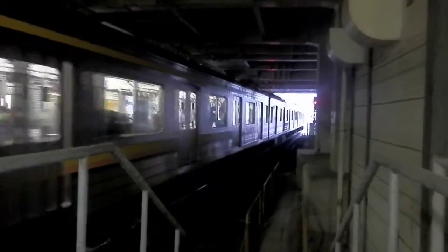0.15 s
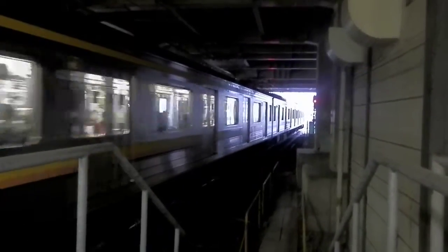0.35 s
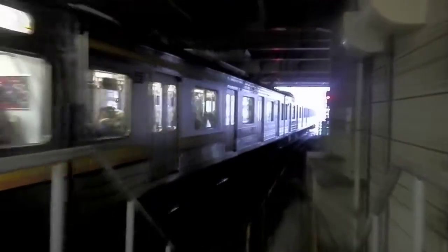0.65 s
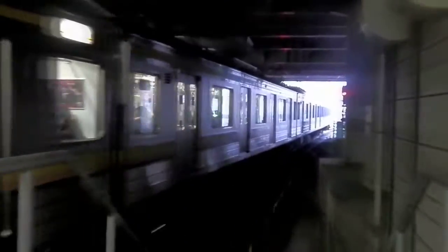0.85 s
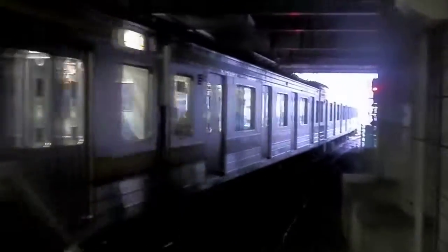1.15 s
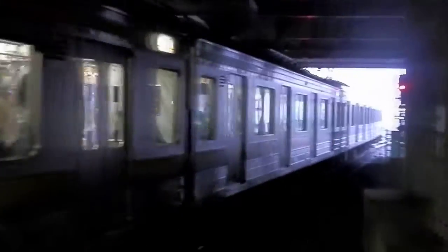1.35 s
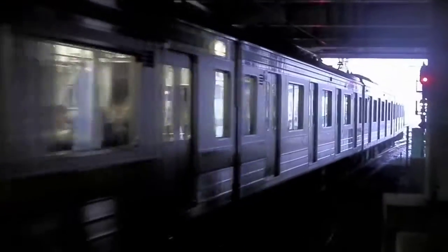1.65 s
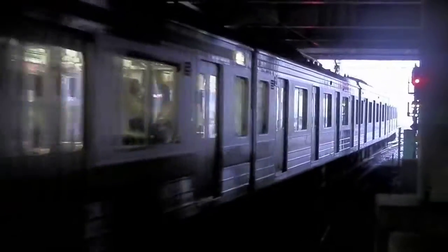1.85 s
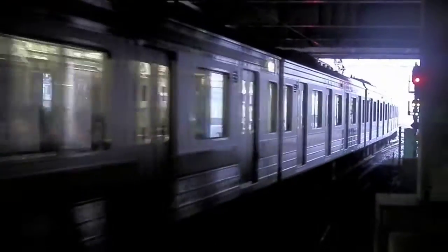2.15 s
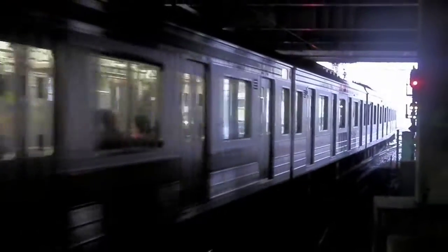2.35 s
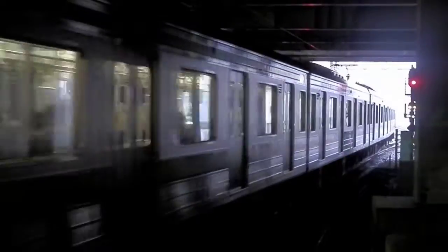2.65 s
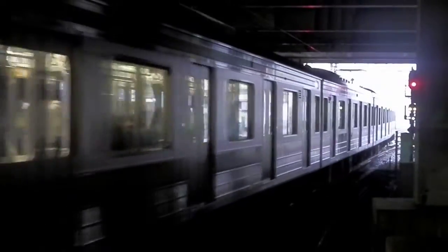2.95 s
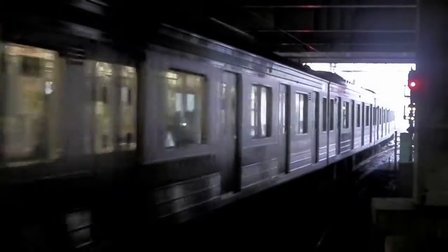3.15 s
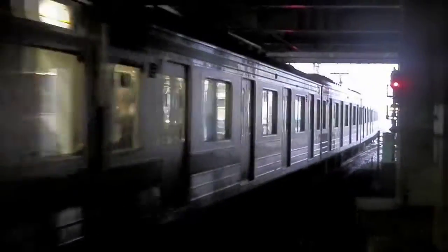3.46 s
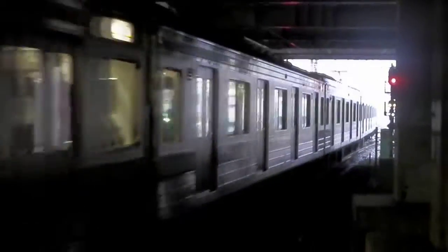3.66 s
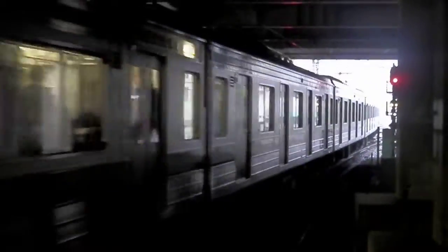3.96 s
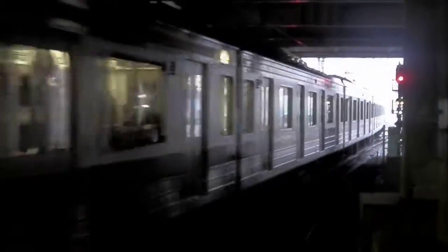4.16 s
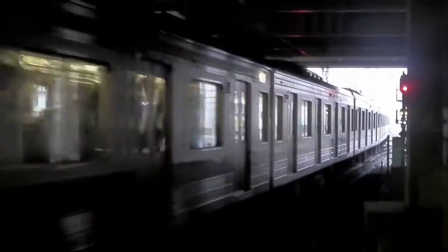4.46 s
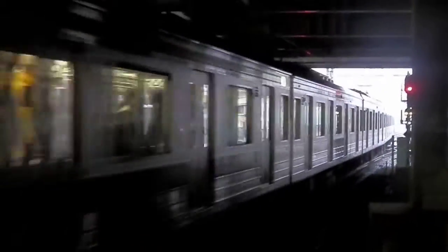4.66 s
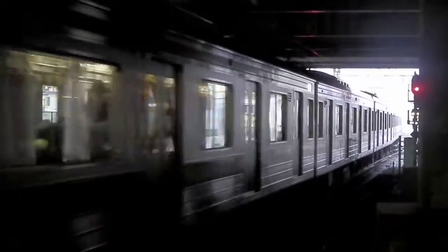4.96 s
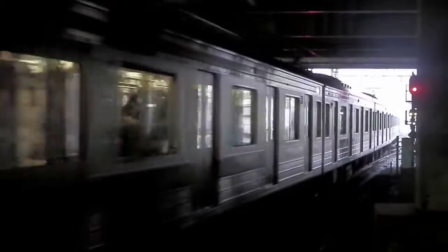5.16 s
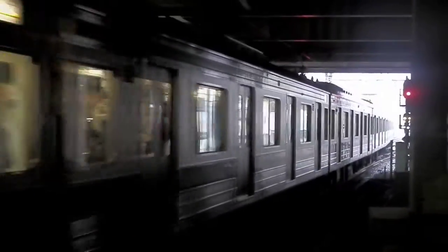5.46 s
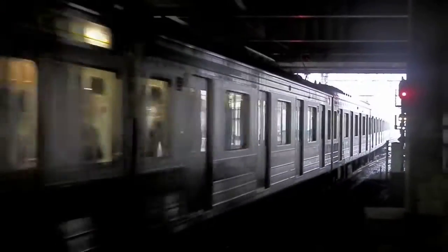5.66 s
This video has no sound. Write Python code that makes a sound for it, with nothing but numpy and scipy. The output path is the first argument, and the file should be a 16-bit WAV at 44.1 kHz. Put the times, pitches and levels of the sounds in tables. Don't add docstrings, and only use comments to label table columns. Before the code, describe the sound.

A departing train passes a small mono recorder in a dark covered station. Its gear whine wobbles, cuts out and swells as motors beat against one another, climbing gradually in pitch. Wheels rumble and roll steadily, with faint metallic ringing and hiss. The broad hiss dulls briefly, then a tiny case knock makes the sound drop and recover. Later swells also pump the level; friction hiss strengthens near the end.

```python
import sys
import numpy as np
from scipy import signal
from scipy.fft import rfft, irfft, next_fast_len
from scipy.io import wavfile
from scipy.ndimage import uniform_filter1d

SR = 44100
rng = np.random.default_rng(int(sys.argv[2]) if len(sys.argv) > 2 else 0)


def gain_from_decibels(decibels):
    exponent = np.asarray(decibels, float) / 20
    return 10 ** exponent


def master(y):
    cut = np.clip(np.atleast_2d(y).T, -1, 1)
    pcm = np.round(cut * 32767)
    wavfile.write(sys.argv[1], SR, pcm.astype(np.int16))


N = 255780

# [t/s, gear tooth rate f/Hz, level/dB]
MOTOR_WHINE = [(0, 264.7, -11), (.15, 261.4, -8), (.45, 262.9, -6.5), (.7, 269.1, -13.5),
               (1.18, 273.6, -11.5), (1.28, 276, -8.5), (1.42, 273, -22), (1.601, 281, -7.5),
               (1.95, 280.6, -10), (2.161, 282.3, -3), (2.26, 282, -11), (2.621, 286.5, -11),
               (2.88, 287.3, -2.5), (3.379, 292.8, -4), (3.7, 297.4, -9.5), (4.35, 307.9, -10),
               (4.74, 315.9, -8.5), (5.8, 332.9, -18.5)]
# [t/s, depth/dB, sinking/s, returning/s]
MOTOR_SLIPS = [(0, 6, .05, 0.092), (.12, 12, .04, 0.024), (.2, 25, 0.041, 0.16), (.39, 14, .06, 0.048),
               (.5, 16, 0.046, 0.23), (0.741, 30, 0.14, 0.084), (.88, 28, 0.14, 0.026),
               (1.12, 24, .11, 0.057), (1.231, 42, 0.063, .05), (1.319, 12.5, .04, .06),
               (1.41, 18, .03, 0.029), (1.54, 15, 0.13, .04), (1.61, 18, 0.023, 0.051),
               (1.679, 27, 0.038, 0.066), (1.79, 26, 0.031, .18), (2.061, 27, 0.091, 0.093),
               (2.51, 19, .03, 0.016), (2.559, 28, .03, .06), (2.651, 14, .03, 0.034),
               (2.832, 34.5, 0.055, 0.033), (3.29, 36, 0.076, 0.098), (3.51, 12, .13, 0.14),
               (3.7, 8, 0.12, 0.026), (3.87, 5.5, .04, .06), (4.01, 22, .03, 0.058),
               (4.33, 12, 0.019, 0.19), (4.81, 21, .07, 0.098), (4.96, 11, 0.068, .13),
               (5.14, 24, 0.038, .25), (5.43, 11, .07, .36)]
# [t/s, share added or cancelled, length/s]
QUICK_BEATS = [(0.037, -0.6, 0.011), (0.724, 11.5, .008), (0.855, 3, 0.006), (.948, -0.24, 0.017),
               (1.807, 1, 0.015), (2.056, 2.5, 0.0083), (2.274, 0, .02), (2.375, -0.04, 0.016),
               (2.751, -1, 0.01), (3.108, -0.1, 0.028), (3.188, -0.5, .012), (3.805, -.35, 0.016),
               (4.129, 0.15, 0.024), (4.24, 0.6, 0.007), (4.383, -2.1, 0.0068), (4.708, -0.5, 0.0068),
               (4.829, 4, 0.0077), (4.852, -1, 0.0083), (5.02, 0.2, 0.02), (5.051, -0.5, 0.0087),
               (5.251, 0.5, 0.0073), (5.569, -0.5, .012), (5.724, 0.6, 0.017), (5.757, -1, 0.006),
               (0.616, 1.7, 0.0091), (0.792, 3.2, 0.012), (2.624, 1.5, 0.017), (2.963, -.4, 0.011),
               (4.564, -.7, .018), (5.334, 0.45, 0.019)]
# [f/Hz, level/dB]
GEAR_HOUSING = [(525, -24), (555, -32), (600, -26.5), (665, -26), (800, -33), (835, -40), (935, -35.5),
                (1000, -35)]
# [t/s, nearness level/dB, friction level/dB]
PASSING_WHEELS = [(0, 0, 5.5), (.2, 0.5, 8), (.32, 4, 4.5), (.46, 1.5, -2.5), (.7, 0, -3.5), (1.2, -2, -6),
                  (1.5, -2, -9), (1.75, -2.5, -4), (2.1, -0.5, 2), (2.45, 2.5, -2), (2.88, 4.5, -.5),
                  (3.1, -0.5, -1), (3.55, 0, 1), (4.1, 1, 1), (4.3, 3, -1.5), (4.7, 3.5, 8.5), (5.15, 4, 4),
                  (5.8, 1.5, -4)]
# (level/dB, share of nearness, share of friction, gain/dB per 100 Hz of tooth rate,
# loss under the hand/dB)
LAYER_LEVELS = dict(rumble=(-27, 1.16, 0.01, -1.5, -0.5), roll=(-18, 1.04, 0.12, -0.5, 1.4),
                bogie=(-26.5, 1.04, 0.22, 5.5, 1), ring=(-33, 1.08, 0.36, 7.5, 3),
                broad=(-37, 0.8, 0.57, 4, 21.5), high=(-46, 0.17, 1.12, -0.5, -1.3),
                top=(-70, 0.6, 1.2, 2.5, -1), disc=(-48.5, 1.1, 0.1, 22.5, -2))

RUMBLE_COLOUR = [(18, -33), (35, -11), (60, -4.5), (85, 0.5), (110, -3), (150, -1.5), (210, 3), (280, -33)]
# [f/Hz, level/dB per Hz]
ROLL_COLOUR = [(130, -21.5), (200, -4.5), (240, -0.5), (290, 3.5), (350, 1.5), (440, -2), (520, -3),
               (600, -7), (700, -18.5), (900, -39.5)]
# [f/Hz, level/dB per Hz]
BOGIE_COLOUR = [(450, -28), (620, -1), (750, 2), (900, -4.5), (1000, -7.5), (1150, -8), (1300, -10),
                (1800, -32.5)]
# [f/Hz, level/dB per Hz]
RING_COLOUR = [(1000, -21), (1400, 1), (1700, -2.5), (1950, -1.5), (2300, -1.5), (2800, -7), (3100, -10),
               (3600, -15), (4500, -25), (6000, -47.5)]
# [f/Hz, level/dB per Hz]
DISC_COLOUR = [(1750, -30), (1880, -2.5), (1960, 0.5), (2080, -4), (2250, -29.5)]
# [f/Hz, level/dB per Hz]
BROAD_COLOUR = [(1800, -19.5), (2800, -1.5), (3600, -3.5), (4600, -2.5), (5500, -6.5), (7000, -8.5),
                (8300, -15.5), (10000, -34), (12000, -41)]
# [f/Hz, level/dB per Hz]
HIGH_COLOUR = [(4000, -25), (5500, -9), (7000, -3.5), (7900, 0), (8800, -6.5), (10000, -13.5), (11300, -28),
               (13000, -40.5)]
# [f/Hz, level/dB per Hz]
TOP_COLOUR = [(9500, -22), (11000, 0.5), (14500, -1.5), (15700, -1), (16200, -39)]

# [f/Hz, width/Hz, level/dB]
RAIL_RESONANCES = [(537, 17, 3.5), (83, 36, 1.5)]
# [f/Hz, width/Hz, level/dB]
WHEEL_RESONANCES = [(1110, 50, 3.5), (1410, 110, 0.5), (1920, 140, 3), (2270, 44, 3), (2900, 72, 1.5),
                    (3700, 80, 3.5)]
# [t/s, length/s, gain/dB]
TOP_LIFTS = [
    (.44, .885, 7),
    (1.95, .5, 3.5),
    (3.33, .64, 7),
    (4.22, 1.5, 7),
]
# [t/s, level/dB, brightness 0-1]
TICK_CONTACTS = [
    (1.3227, -38, 0.9),
    (1.3234, -40.5, 0.7),
    (1.3237, -33.5, .95),
    (1.3242, -23, 0.1),
    (1.3246, -27.5, .35),
    (1.3269, -30, 0.25),
]
# [f/Hz, level/dB, time to fall 60 dB/s]
CASE_MODES = [(1790, 1, 0.016), (2293, -4, 0.0064), (2860, -3, 0.011), (3400, -1.5, 0.0057),
              (3970, -10, .006), (5530, -7.5, .005), (6550, -7, 0.0055), (7300, -5, 0.0079),
              (8500, -4, 0.0031), (10200, -9, 0.0017), (12200, -13, .002), (14000, -8, 0.0016),
              (15700, -11.5, .002)]
# [t/s, depth/dB, attack/s]
GAIN_DUCKS = [(0.089, 5, 0.0051), (.34, 1.5, .005), (0.436, 4, 0.005), (1.3228, 14.5, 0.0048),
              (2.115, 3.5, 0.0085), (2.525, 5.5, 0.0079), (2.866, 7.5, .008), (3.21, 3, 0.0079),
              (3.885, 2.5, 0.0083), (3.97, 2.5, .008), (4.225, 3.5, .008), (4.55, 4, 0.0077),
              (4.68, 3, 0.0081), (4.91, 2.5, .008), (5.326, 2.5, .008)]

DUCK_HOLD_S, DUCK_RELEASE_S = 0.078, 0.32
MEAN_TOOTH_HZ = 290
HAND_ON_S, HAND_OFF_S, HAND_MOVE_S = 0.45, 1.43, 0.049
TIME = np.arange(N) / SR


def motors(roll_db):
    s, hz, db = np.transpose(MOTOR_WHINE)
    pitch = np.interp(TIME, s, hz)
    turn = 2 * np.pi * np.cumsum(pitch) / SR

    in_step = np.ones(N)
    for at, depth_db, sink, back in MOTOR_SLIPS:
        slip = np.interp(TIME, [at - sink, at, at + back], [0, 1, 0])
        in_step *= 1 - (1 - gain_from_decibels(-depth_db)) * slip
    swell = uniform_filter1d(np.interp(TIME, s, gain_from_decibels(db)) * in_step, size=500)
    beats = np.zeros(N)
    for at, share, length in QUICK_BEATS:
        beats += share * np.exp(-0.5 * ((TIME - at) / length) ** 2)
    swell *= 1 + beats
    flicker = gain_from_decibels(1.2 * drift(16.0))
    near = np.sqrt(2) * swell * flicker * np.sin(turn + 0.2 * drift(9.0))

    glide = 2 * np.pi * np.cumsum(uniform_filter1d(pitch, size=20000)) / SR
    far = gain_from_decibels(roll_db - 16.0) * beating(glide, 16.0)
    housing_hz, housing_db = np.transpose(GEAR_HOUSING)
    second_db = np.interp(2 * pitch, housing_hz, housing_db)
    third_db = np.interp(3 * pitch, housing_hz, housing_db)
    second = gain_from_decibels(second_db) * beating(2 * glide, 15.0)
    third = gain_from_decibels(third_db) * beating(3 * glide, 18.0)
    return near + far + second + third


def wheels(roll_db):
    rumble = gain_from_decibels(layer_db("rumble")) * coloured(RUMBLE_COLOUR, patchy_db=0.5, modes=RAIL_RESONANCES)
    roll = gain_from_decibels(roll_db) * coloured(ROLL_COLOUR, patchy_db=1.5, modes=RAIL_RESONANCES)
    bogie = gain_from_decibels(layer_db("bogie")) * coloured(BOGIE_COLOUR, patchy_db=1.52, modes=WHEEL_RESONANCES)
    ring = gain_from_decibels(layer_db("ring") + 0.64) * coloured(RING_COLOUR, patchy_db=0.24, modes=WHEEL_RESONANCES)
    disc = gain_from_decibels(layer_db("disc")) * coloured(DISC_COLOUR, patchy_db=3.0)
    return rumble + roll + bogie + ring + disc


def tick():
    out = np.zeros(N)
    s, db, bright = np.transpose(TICK_CONTACTS)
    for k, (hz, mode_db, t60) in enumerate(CASE_MODES):
        clicks = np.full(N, 1e-18)
        tilt_db = -12.0 * (0.5 - bright) * np.log2(hz / 1760)
        clicks[np.round(s * SR).astype(int)] = gain_from_decibels(db + mode_db + tilt_db)
        r = gain_from_decibels(-60 / (t60 * SR))
        w = 2 * np.pi * hz / SR
        ringing = signal.lfilter([0, np.sin(w)], [1, -2 * r * np.cos(w), r * r], clicks)
        out += (-1) ** k * ringing
    return out


def hiss():
    lift_db = np.zeros(N)
    for s, length, gain_db in TOP_LIFTS:
        lift_db += gain_db * ((TIME > s) & (TIME < s + length))
    top_db = layer_db("top") + uniform_filter1d(lift_db, size=2500)
    broad = gain_from_decibels(layer_db("broad") + 0.23) * coloured(BROAD_COLOUR, patchy_db=0.77)
    high = gain_from_decibels(layer_db("high")) * coloured(HIGH_COLOUR, patchy_db=1.5)
    top = gain_from_decibels(top_db) * coloured(TOP_COLOUR, patchy_db=1.2)
    return broad + high + top


def layer_db(name):
    level_db, near, rub, faster_db, shade_db = LAYER_LEVELS[name]
    near_db, friction_db = in_time(PASSING_WHEELS)
    covering = np.tanh((TIME - HAND_ON_S) / HAND_MOVE_S)
    lifting = np.tanh((TIME - HAND_OFF_S) / HAND_MOVE_S)
    hand = 0.5 * (covering - lifting)
    speed = (in_time(MOTOR_WHINE)[0] - MEAN_TOOTH_HZ) / 100
    return level_db + near * near_db + rub * friction_db + faster_db * speed - shade_db * hand


def beating(turn, blur_hz):
    return drift(blur_hz) * np.cos(turn) + drift(blur_hz) * np.sin(turn)


def coloured(spectrum, patchy_db, modes=()):
    size = next_fast_len(N)
    bins = np.arange(1, size // 2 + 2) * SR / size
    hz, db = np.transpose(spectrum)
    shape_db = np.interp(np.log(bins), np.log(hz), db, -90, -90)
    for mode_hz, width, mode_db in modes:
        shape_db += mode_db / (1 + (2 * (bins - mode_hz) / width) ** 2)
    noise = irfft(rfft(rng.standard_normal(size)) * gain_from_decibels(shape_db), size)[:N]
    return rms_one(noise * gain_from_decibels(patchy_db * drift(16.0)))


def drift(rate_hz):
    r = np.exp(-80 * np.pi * rate_hz / SR)
    noise = rng.standard_normal(N // 40 + 2002)
    slow = signal.lfilter([1], [1, -2 * r, r * r], noise)[2000:]
    return np.interp(np.arange(N) / 40, np.arange(len(slow)), rms_one(slow))


def in_time(rows):
    s, *columns = np.transpose(rows)
    return [np.interp(TIME, s, c) for c in columns]


def rms_one(x):
    return x / np.sqrt(np.mean(np.abs(x) ** 2) + 1e-20)


def scene():
    roll_db = layer_db("roll")
    mix = motors(roll_db) + wheels(roll_db) + hiss() + gain_from_decibels(7.5) * tick()
    return mix[None]


def band_limit(x):
    return signal.sosfilt(signal.butter(12, 15750, fs=SR, output="sos"), x)


def record(dry):
    gain_db = np.zeros(N)
    for s, depth_db, attack in GAIN_DUCKS:
        since = np.maximum(TIME - s, 0)
        drop = 1 - np.exp(-since / attack)
        creep_back = np.exp(-np.maximum(since - DUCK_HOLD_S, 0) / DUCK_RELEASE_S)
        gain_db -= depth_db * drop * creep_back
    rounded = 0.9 * np.tanh(dry * gain_from_decibels(gain_db) / 0.9)
    low_pass = signal.cheby2(10, 50, 17000, fs=SR, output="sos")
    mix = signal.sosfilt(low_pass, rounded)
    return band_limit(mix)


dry = scene()
out = record(dry)
master(out)
```